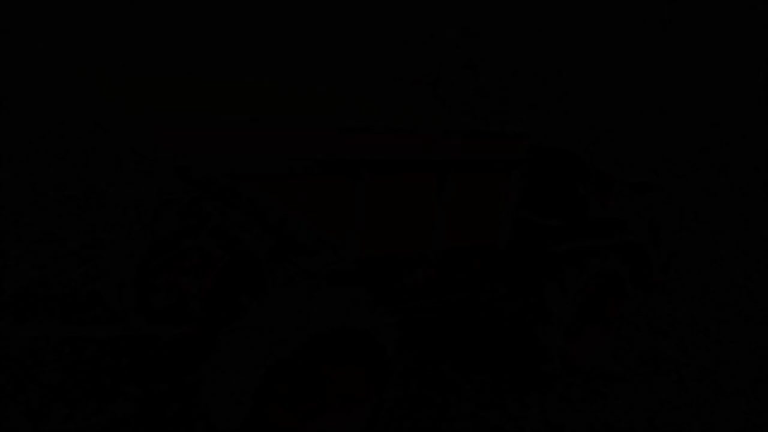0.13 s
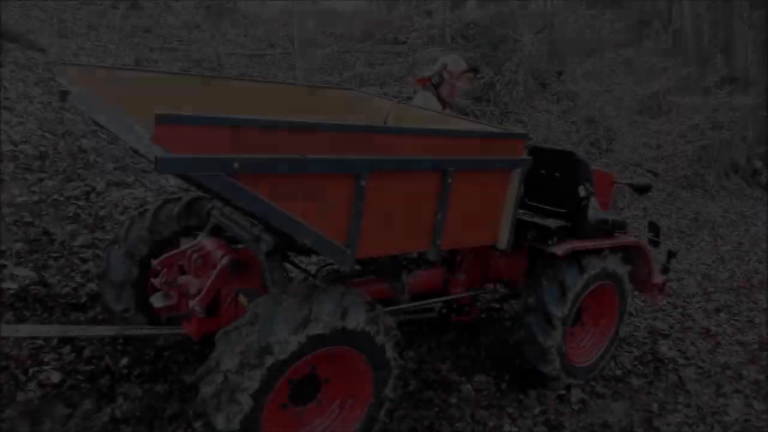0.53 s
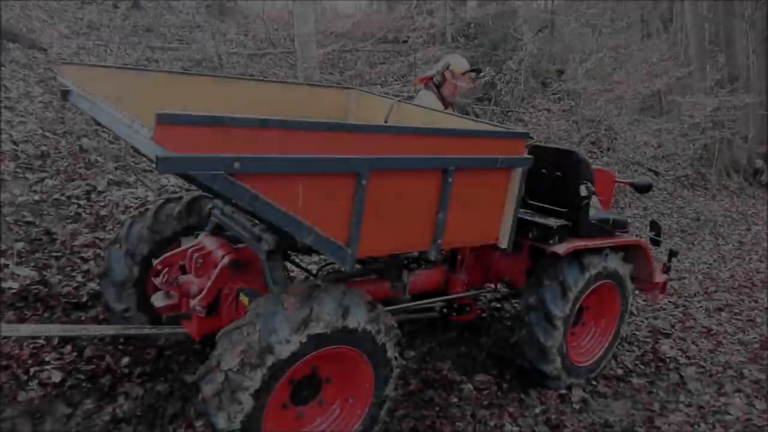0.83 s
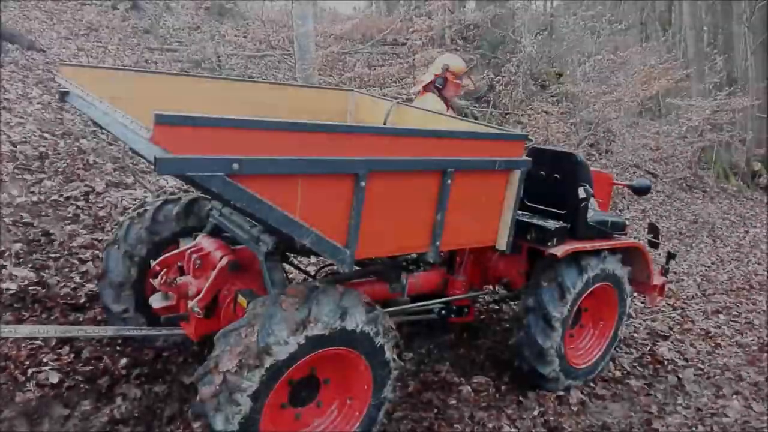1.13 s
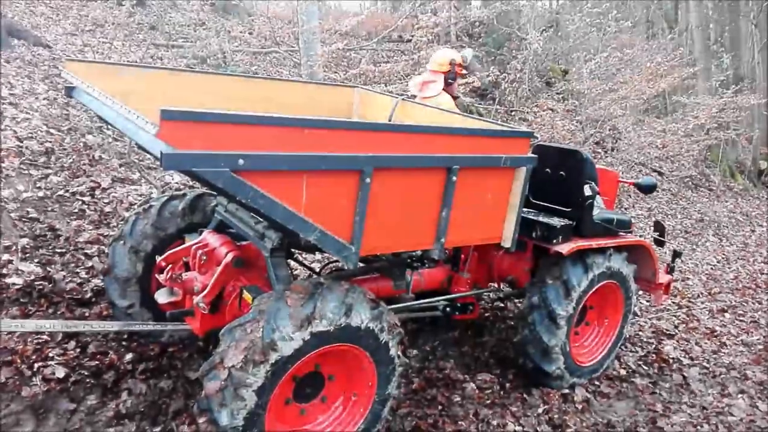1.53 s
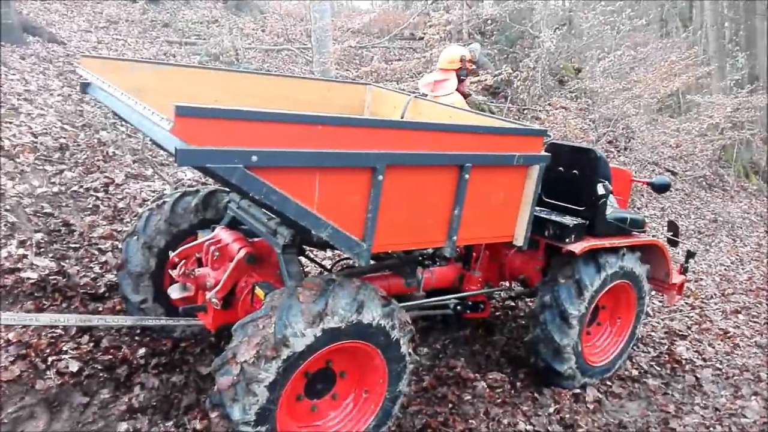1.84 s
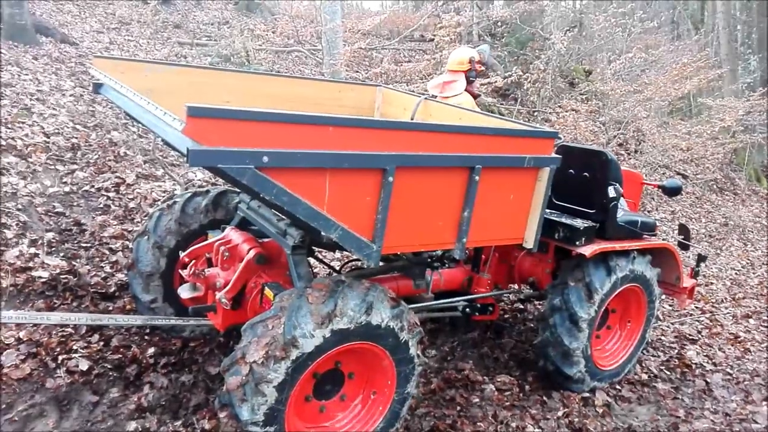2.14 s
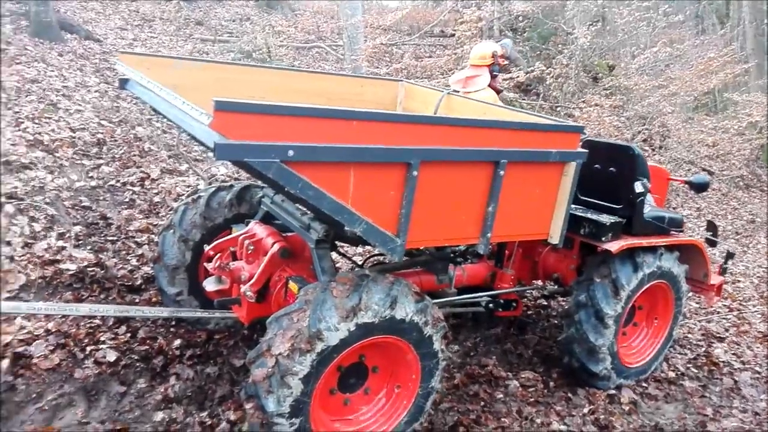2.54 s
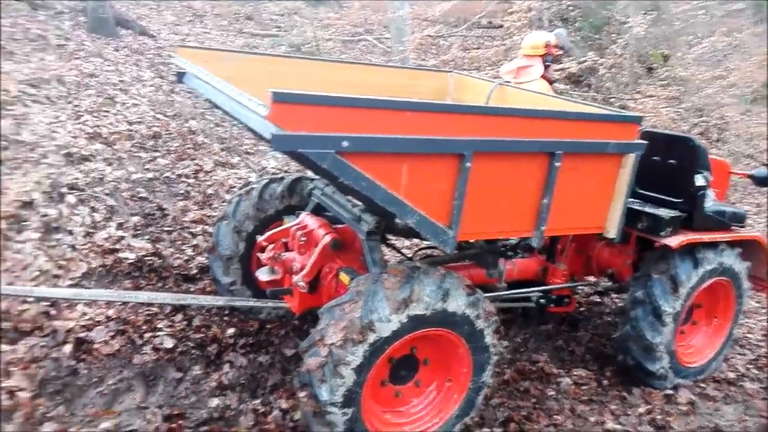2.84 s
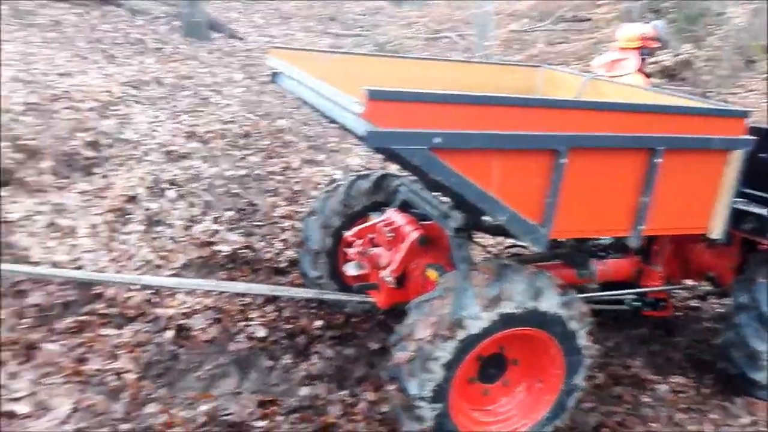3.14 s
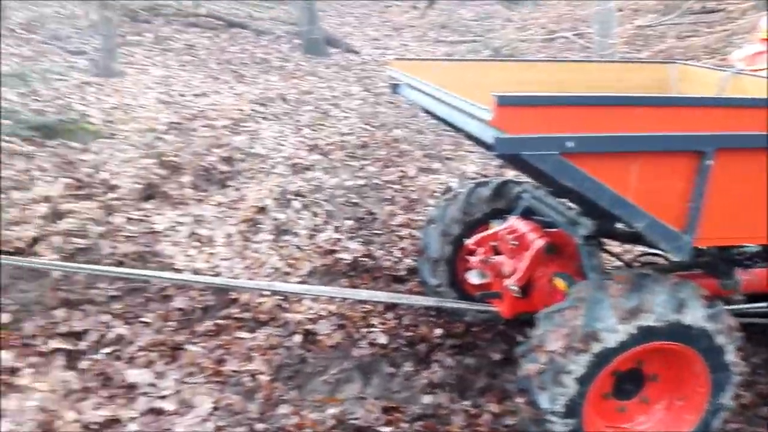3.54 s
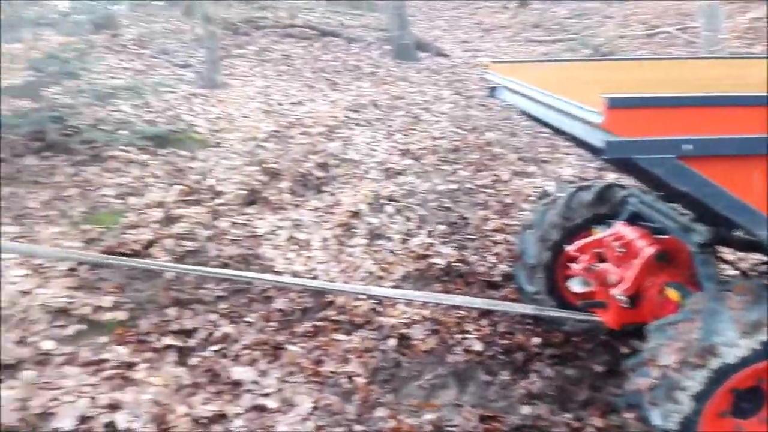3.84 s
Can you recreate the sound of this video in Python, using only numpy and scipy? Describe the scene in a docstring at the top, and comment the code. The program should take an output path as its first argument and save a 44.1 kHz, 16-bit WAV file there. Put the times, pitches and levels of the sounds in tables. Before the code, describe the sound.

Slow diesel engine of a small dump tractor: each firing gives a hard knock, low exhaust thump, valve ticks and a puff of air, over gear churn and panel rattle, rising from silence to close and loud in woods.

```python
"""A single-cylinder diesel tractor fades in and grows louder in a forest, about five firings a second.
Each firing: combustion and piston slap ring the block under a gritty crack, and the frame recoils.
Then the exhaust thumps, a rocker ticks, the intake gulps, a valve ticks and air hisses before the next firing.
Throughout: gear noise, panel taps spread over the cycle, sparse leaf snaps and a faint scattered tail
from the trees. Struck parts are decaying sines; rasps, crack, gears and air are coloured noise."""
import sys
import numpy as np
from scipy import signal
from scipy.fft import rfft, irfft
from scipy.io import wavfile

SR = 44100
rng = np.random.default_rng(int(sys.argv[2]) if len(sys.argv) > 2 else 0)


def to_wav(sig):
    """Store sig (one row per channel, or 1-D mono) as 16-bit WAV at the path in sys.argv[1].

    Samples outside -1..1 are clipped; the rate is SR.
    """
    pcm = np.clip(np.atleast_2d(sig), -1, 1) * 32767
    pcm = np.round(pcm).astype(np.int16)
    wavfile.write(sys.argv[1], SR, pcm.T)  # frames by channels


N = 176400
T = np.arange(N) / SR

# Fade-in and approach, all layers but the knock: time_s, level_db
APPROACH = [(0, -83), (0.15, -48.5), (0.31, -30.5), (0.5, -23), (0.7, -18.5), (1.09, -13.5), (1.68, -10),
            (2.08, -5.5), (2.67, -3.5), (3.06, -3), (3.26, 0.26), (3.85, 1.06)]
# Firings with their own knock levels: start_s, level_db
FIRINGS = [(0.2275, -75.5), (0.4241, -59.5), (0.6206, -55), (0.8169, -50), (1.014, -47), (1.2103, -46),
           (1.4065, -50), (1.6032, -45), (1.8004, -42.5), (1.9972, -40), (2.1943, -38.3), (2.39, -40.5),
           (2.5864, -37.5), (2.7824, -38), (2.9794, -39.5), (3.1766, -34.5), (3.373, -33.5),
           (3.5695, -37.5), (3.7663, -35), (3.9635, -32.5)]
# Blows within one knock, combustion then piston slap: delay_s, level_db
KNOCK_BLOWS = [(-.0004, 1.5), (.00366, 1.8), (.00706, 0.5), (.01264, -3.5)]

# Resonances of the struck or pumped parts: pitch_hz, level_db, t60_s
BLOCK_MODES = [(448, -17, 0.093), (710, -6.5, 0.051), (777, -16.5, 0.084), (890, -22.5, 0.14),
               (1041, -4, 0.12), (1170, -9, 0.076), (1330, -2, 0.083), (1398, 2, 0.06), (1494.6, -5, 0.046),
               (1598, -1.5, 0.056), (1924, -14, 0.064), (2268, -13, 0.05), (2494, -17, 0.1),
               (3704, -25, 0.15)]
EXHAUST_MODES = [(44.76, -24.5, 0.49), (59.2, -29, 0.51), (77.8, -18.8, 0.3), (137, -46, 0.42),
                 (138.2, -25, 0.5), (226, -23, 0.45)]
INTAKE_MODES = [(41.9, -31.5, 0.77), (83.3, -27.5, 0.24), (109.4, -25.0, 0.12), (264, -35, 0.15)]
FRAME_MODES = [(52.4, -36, 0.61), (145.7, -36.5, 0.27), (199.8, -37.5, 0.35), (304.6, -27, 0.13)]
# Covers and loose panels: pitch_hz, level_db, t60_s
PANEL_MODES = [(438.6, -6.5, 0.1), (572, -7, 0.057), (674, -7, 0.035), (884, 1.5, 0.056),
               (1017, -4.5, 0.13), (1189, -2.5, 0.058), (1263, 2, 0.11), (1406, -4, 0.045),
               (1490, -3.5, 0.032), (1584, 1.5, 0.059), (2070, -4, 0.023), (2236, -3.5, 0.059),
               (2877, -9.5, .06), (3165, -3, 0.036)]
# Valve gear, one tick each a cycle: pitch_hz, level_db, t60_s
ROCKER_MODES = [(1415, 2, 0.068), (5960, -8, 0.044), (6300, -13.5, .06), (6700, -9.5, .06),
                (8200, -13, 0.085)]
VALVE_MODES = [(1514, 6, 0.047), (3115, -9.5, 0.04), (3470, -4, 0.063), (5340, -7.5, 0.069),
               (5686, -4.5, 0.067), (6010, -7, 0.064)]

# Noise colours, relative spectral density: frequency_hz, level_db
CRACK_COLOUR = [(300, -14), (600, -2), (1000, 2), (1550, 2.5), (1780, -5), (2450, -2.5), (3000, -8.5),
                (3900, -11.5), (5000, -15.5), (7000, -22), (13000, -39.5)]
GEAR_COLOUR = [(25, 6), (60, 11.5), (150, 9.5), (280, 7), (360, -3), (700, -2), (1400, -5), (1800, -5),
               (3400, -13), (4500, -18), (6200, -19.5), (9500, -29), (14000, -29.5)]
ROCKER_COLOUR = [(600, -7.5), (1400, 19.5), (2500, -9), (4700, -11), (6300, 1.5), (7300, -10), (8600, -8),
                 (11500, -20), (14000, -16.5)]
VALVE_COLOUR = [(600, -1), (1400, 18), (2500, -13), (3400, -3), (4400, -7), (5700, 10.5), (7500, -4.5),
                (10500, -11.5), (14000, -9)]
AIR_COLOUR = [(800, 14), (2300, 12), (4000, 1.5), (6000, -4), (8300, 2), (11000, -1.5), (14000, -9)]

BLOW_JITTER_S, BLOW_SPREAD_DB, KNOCK_TRIM_DB = .00007, 2, -0.5
# delays after each firing
EXHAUST_DELAY_S, ROCKER_DELAY_S, INTAKE_DELAY_S = .05, .072, .0793
VALVE_DELAY_S, AIR_DELAY_S = .107, .174
ROCKER_DB, VALVE_DB, TICK_SPREAD_DB = -55, -53.5, 1.5
TAP_DB, TAP_SPREAD_DB, TAP_JITTER_S = -51.5, 2.5, .0003
TAP_SLOPE_DB_PER_S = -35  # later taps in a cycle are weaker
GEARS_DB = -46.5
CRACKLES_PER_S, CRACKLE_DB, CRACKLE_DECAY_S = 79, -49, .00094
FOREST_DB, FOREST_T60_S, FOREST_GAP_S = -17.5, 0.4, .02
CUTOFF_HZ = 14300
TINY = 1e-18  # keeps the filters out of denormals


def from_db(db):
    """Decibels to gain."""
    return 10 ** (np.asarray(db) / 20)


def loudness(time_s):
    """Approach gain at the given times."""
    return from_db(np.interp(time_s, *np.transpose(APPROACH)))


def clicks(start_s, gain):
    """Impulses at the given times."""
    out = np.zeros(N)
    at = np.round(np.ravel(start_s) * SR).astype(int)
    inside = (at >= 0) & (at < N)
    np.add.at(out, at[inside], np.ravel(gain)[inside])
    return out


def ring(x, pitch_hz, t60_s):
    """Two-pole resonator: a unit click starts a decaying sine of height 1."""
    radius = from_db(-60 / (t60_s * SR))
    angle = 2 * np.pi * pitch_hz / SR
    poles = [1, -2 * radius * np.cos(angle), radius * radius]
    return signal.lfilter([0, np.sin(angle)], poles, x + TINY)


def struck(modes, start_s, gain, spread_db):
    """Modal strike: every blow excites each mode with a strength of its own."""
    out = np.zeros(N)
    for k, (pitch_hz, level_db, t60_s) in enumerate(modes):
        strength = gain * from_db(spread_db * rng.standard_normal(start_s.shape))
        sign = (-1) ** k
        out += sign * from_db(level_db) * ring(clicks(start_s, strength), pitch_hz, t60_s)
    return out


def grit(colour, grain_db):
    """Coloured noise of rms 1, its strength redrawn every 20 samples."""
    frequency_hz, level_db = np.transpose(colour)
    f = np.maximum(np.arange(N // 2 + 1) * SR / N, 1)
    size = np.repeat(from_db(grain_db * rng.standard_normal(N // 20 + 1)), 20)[:N]
    grains = rng.standard_normal(N) * size
    shape = from_db(np.interp(np.log(f), np.log(frequency_hz), level_db))
    bass_cut = np.hypot(1, (frequency_hz[0] / f) ** 2)
    x = irfft(rfft(grains) * shape / bass_cut, N)
    return x / x.std()


def swell(start_s, gain, attack_s, hold_s, t60_s):
    """Attack, hold and decay after each time; overlaps add in power."""
    age_s = np.maximum(T - start_s[:, None], 0)
    attack = np.minimum(age_s / attack_s, 1)
    decay = np.exp(-np.log(1000) * np.maximum(age_s - attack_s - hold_s, 0) / t60_s)
    return np.sqrt(gain ** 2 @ (attack * decay) ** 2)


def forest(x):
    """Trunks scatter a faint, dull tail: convolution with decaying band-passed noise."""
    t = T[:SR // 2]
    tail = rng.standard_normal(len(t)) * np.exp(-np.log(1000) * t / FOREST_T60_S) * (t > FOREST_GAP_S)
    band = signal.butter(2, [300, 4000], "band", fs=SR, output="sos")
    tail = signal.sosfilt(band, tail / np.linalg.norm(tail))
    return from_db(FOREST_DB) * signal.fftconvolve(x, tail)[:N]


def leaves():
    """Dry leaves under the tyres: sparse, faint noise bursts at random times."""
    start_s = T[rng.random(N) < CRACKLES_PER_S / SR]
    extra_db = 3 * np.minimum(rng.exponential(1, len(start_s)), 3)
    snaps = clicks(start_s, from_db(CRACKLE_DB + extra_db) * loudness(start_s))
    burst = rng.standard_normal(SR // 200) * np.exp(-T[:SR // 200] / CRACKLE_DECAY_S)
    band = signal.butter(1, [2500, 9000], "band", fs=SR, output="sos")
    burst = signal.sosfilt(band, burst / np.linalg.norm(burst))
    return signal.fftconvolve(snaps, burst)[:N]


def gears():
    """Gear churn: steady gritty noise under the approach gain."""
    return from_db(GEARS_DB) * loudness(T) * grit(GEAR_COLOUR, grain_db=1.5)


def panel_rattle(fire_s, count=22):
    """Loose panels are tapped at much the same points of every cycle."""
    period_s = np.diff(fire_s).mean()
    delay_s = period_s * (np.arange(count) + rng.random(count)) / count
    start_s = fire_s[:, None] + delay_s + TAP_JITTER_S * rng.standard_normal((len(fire_s), count))
    level_db = TAP_DB + TAP_SLOPE_DB_PER_S * delay_s
    return struck(PANEL_MODES, start_s, from_db(level_db) * loudness(start_s), TAP_SPREAD_DB)


def air_hiss(fire_s):
    """A puff of broadband hiss shortly before the next firing."""
    puff_s = fire_s + AIR_DELAY_S
    gain = from_db(-52) * loudness(puff_s)
    return grit(AIR_COLOUR, grain_db=0) * swell(puff_s, gain, attack_s=.006, hold_s=.004, t60_s=.17)


def tick(modes, start_s, level_db, bounce_s, count=3):
    """A small steel part lands and bounces, harder in some cycles than in others."""
    force_db = level_db + TICK_SPREAD_DB * rng.standard_normal((len(start_s), 1))
    bounce = np.arange(count) + .3 * rng.standard_normal((len(start_s), count))
    hit_s = start_s[:, None] + bounce_s * bounce
    return struck(modes, hit_s, from_db(force_db) * loudness(hit_s), spread_db=3.5)


def valve_gear(fire_s):
    """Rocker, then valve: each a bouncing tick inside a swell of rasping noise."""
    rocker_s, valve_s = fire_s + ROCKER_DELAY_S, fire_s + VALVE_DELAY_S
    rocker_gain = from_db(-45.5) * loudness(rocker_s)
    valve_gain = from_db(-53.5) * loudness(valve_s)
    rocker_swell = swell(rocker_s - .008, rocker_gain, attack_s=.0073, hold_s=.006, t60_s=.17)
    valve_swell = swell(valve_s - .003, valve_gain, attack_s=.0036, hold_s=.0081, t60_s=.048)
    rasp = grit(ROCKER_COLOUR, grain_db=-0.5) * rocker_swell + grit(VALVE_COLOUR, grain_db=2.5) * valve_swell
    ticks = (tick(ROCKER_MODES, rocker_s, ROCKER_DB, bounce_s=.0045)
             + tick(VALVE_MODES, valve_s, VALVE_DB, bounce_s=.003))
    return rasp + ticks


def thump(modes, start_s, pulse_s):
    """The slope of a soft pressure pulse sets low resonances swinging."""
    r = np.exp(-1 / (pulse_s * SR))
    smoother = [[1 - r, 0, 0, 1, -r, 0]] * 3  # three one-pole low-passes
    pulse = signal.sosfilt(smoother, clicks(start_s, loudness(start_s)) + TINY)
    slope = np.diff(pulse, prepend=0)
    out = np.zeros(N)
    for pitch_hz, level_db, t60_s in modes:
        out += from_db(level_db) * ring(slope, pitch_hz, t60_s) * SR / (2 * np.pi * pitch_hz)
    return out


def chug(fire_s):
    """The frame recoils, the exhaust blows down, the intake gulps with opposite sign."""
    frame = thump(FRAME_MODES, fire_s, pulse_s=.0005)
    exhaust = thump(EXHAUST_MODES, fire_s + EXHAUST_DELAY_S, pulse_s=.002)
    intake = thump(INTAKE_MODES, fire_s + INTAKE_DELAY_S, pulse_s=.0011)
    return frame + exhaust - intake


def knock(fire_s, level_db):
    """Combustion and piston slap ring the block, with a gritty crack on top."""
    delay_s, blow_db = np.transpose(KNOCK_BLOWS)
    jitter_s = BLOW_JITTER_S * rng.standard_normal((len(fire_s), len(delay_s)))
    blow_s = fire_s[:, None] + delay_s + jitter_s
    blow_gain = from_db(level_db[:, None] + blow_db + KNOCK_TRIM_DB)
    body = struck(BLOCK_MODES, blow_s, blow_gain, BLOW_SPREAD_DB)
    crack_swell = swell(fire_s - .001, from_db(level_db - 5.5), attack_s=.0026, hold_s=.0083, t60_s=.15)
    return body + grit(CRACK_COLOUR, grain_db=2.5) * crack_swell


def scene():
    """The tractor and the leaves, plus their scatter from the trees."""
    fire_s, knock_db = np.transpose(FIRINGS)
    tractor = leaves() + gears() + panel_rattle(fire_s) + air_hiss(fire_s)
    tractor += valve_gear(fire_s) + chug(fire_s) + knock(fire_s, knock_db)
    return (tractor + forest(tractor))[None]


def record(dry):
    """The microphone loses the deepest bass; a steep low-pass cuts the top."""
    x = signal.sosfilt(signal.butter(1, 8, "high", fs=SR, output="sos"), dry)
    return signal.sosfilt(signal.ellip(10, .2, 70, CUTOFF_HZ, fs=SR, output="sos"), x)


dry = scene()
out = record(dry)
to_wav(out)
```